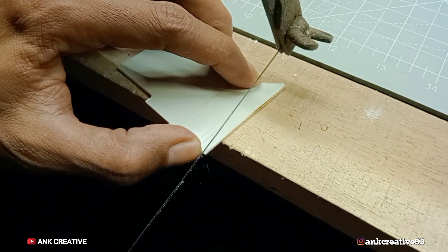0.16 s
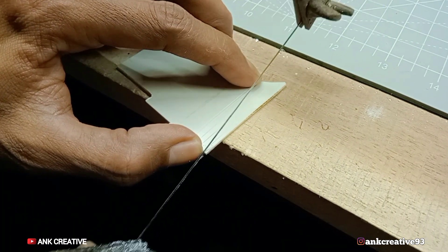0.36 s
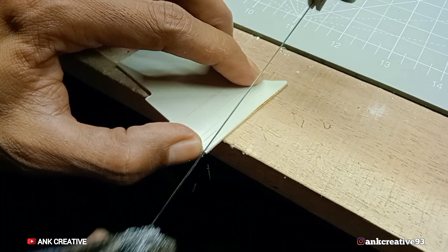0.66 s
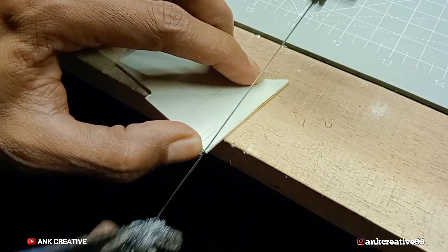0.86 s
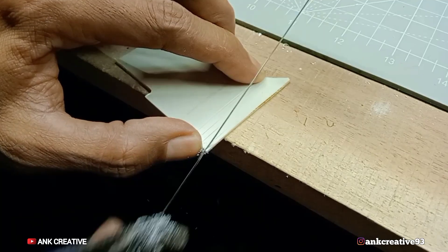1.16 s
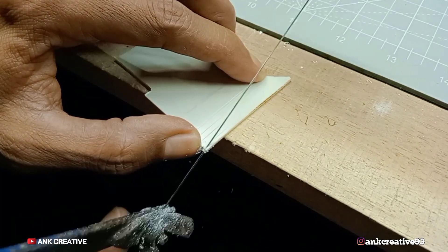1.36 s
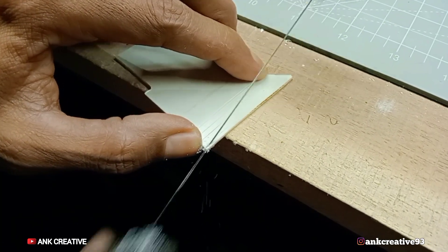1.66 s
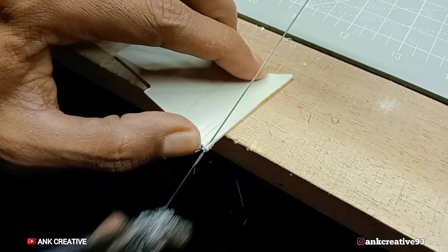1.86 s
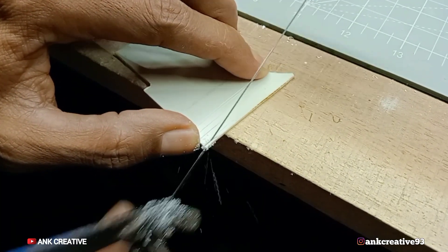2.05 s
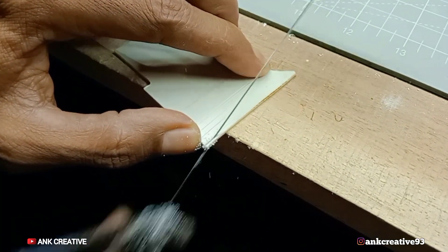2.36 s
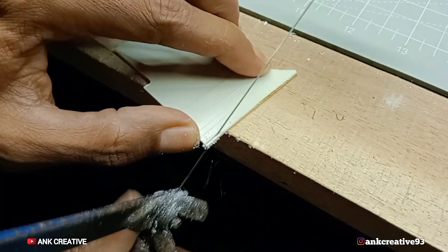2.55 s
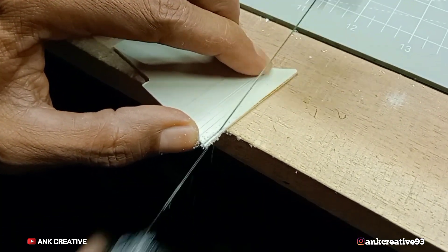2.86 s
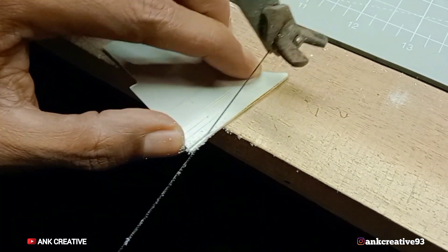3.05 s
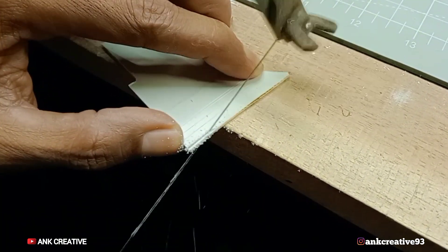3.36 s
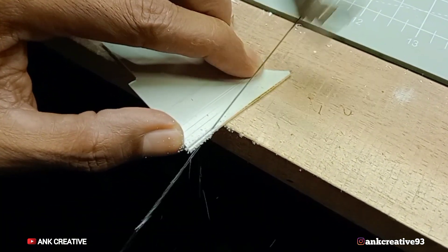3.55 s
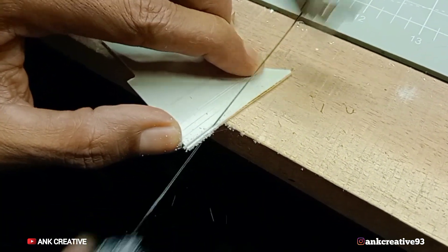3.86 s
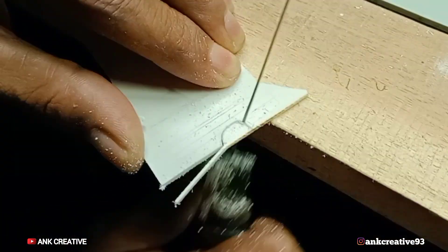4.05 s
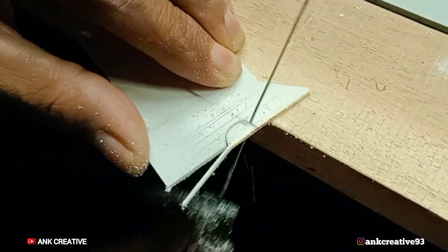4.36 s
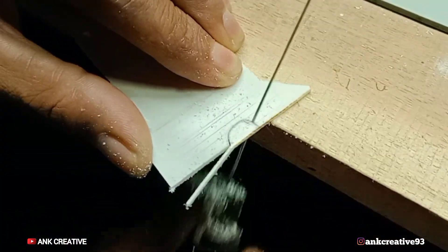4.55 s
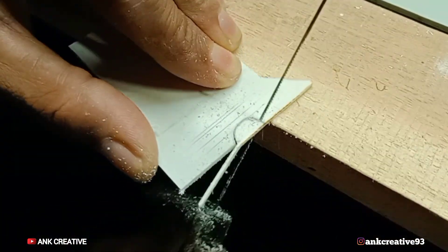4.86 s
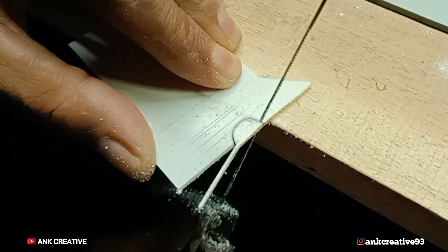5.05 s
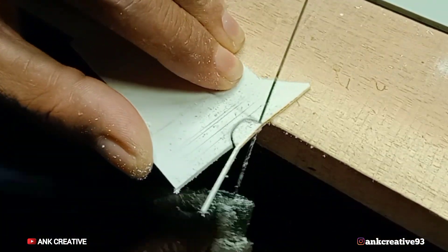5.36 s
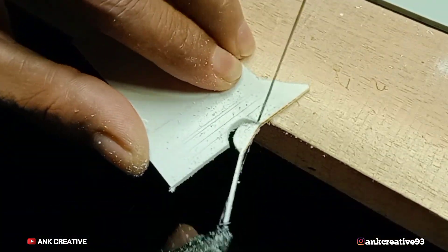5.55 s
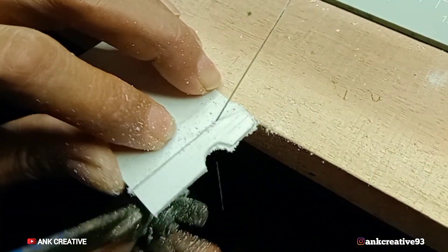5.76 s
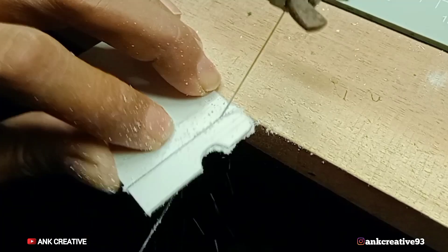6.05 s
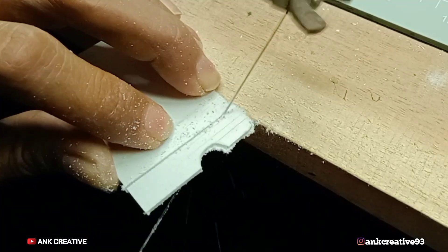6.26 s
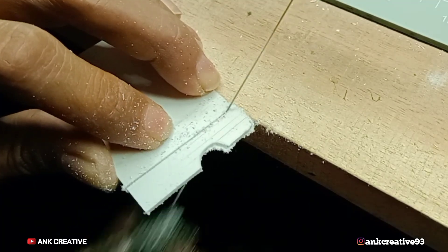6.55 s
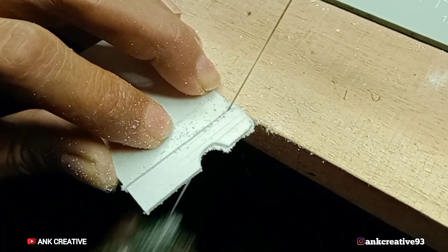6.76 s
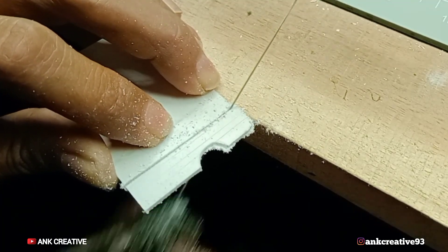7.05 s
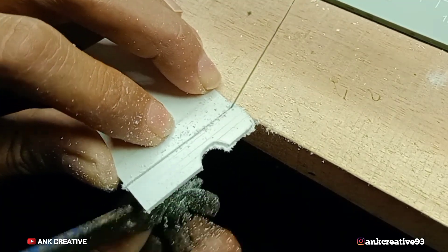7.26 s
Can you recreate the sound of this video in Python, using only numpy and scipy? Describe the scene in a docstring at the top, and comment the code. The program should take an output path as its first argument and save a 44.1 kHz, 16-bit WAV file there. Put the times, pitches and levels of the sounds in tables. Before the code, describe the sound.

Quick rasping saw strokes alternate loud and soft in a small, fairly dry room. They begin almost inaudible, build over a few seconds, pause very briefly, and continue. A hollower, knocking passage with a hard squawking catch follows, then brighter, fuller scraping of plastic that weakens at the close. The microphone is near; a very quiet air murmur and distant wavering insects remain underneath.

```python
"""A fretsaw cuts a thin plastic plate held on the edge of a wooden bench, close to one microphone.
Down strokes, return strokes and faint rubs: tooth impulses and rubbing noise ring plate, bench and blade modes.
Hard and light catches ring single plate modes; low bench modes shudder as the blade chatters.
The balance of the modes changes abruptly at 4.2 and 5.6 s; a short room tail follows the saw.
Filtered noise makes a quiet room murmur and far, wavering cricket bands."""
import sys
import numpy as np
from scipy import signal
from scipy.fft import rfft, irfft, next_fast_len
from scipy.io import wavfile
from scipy.ndimage import uniform_filter1d

SR = 44100
rng = np.random.default_rng(int(sys.argv[2]) if len(sys.argv) > 2 else 0)


def to_linear_factor(level_db):
    """Convert decibel levels (scalar or array-like) to linear amplitude factors."""
    exponent = np.asarray(level_db, float) / 20
    return 10 ** exponent


def to_wav(sig):
    """Store sig (one row per channel, or 1-D mono) as 16-bit WAV at the path in sys.argv[1].

    Samples outside -1..1 are clipped; the rate is SR.
    """
    pcm = np.clip(np.atleast_2d(sig), -1, 1) * 32767
    pcm = np.round(pcm).astype(np.int16)
    wavfile.write(sys.argv[1], SR, pcm.T)  # frames by channels


N = 326340

# plate modes: mode_hz
PLATE_MODES_HZ = (945, 1370, 1740, 1880, 2200, 2560, 2725, 3035, 3310, 3520, 3800, 4200, 4380, 4820, 5480)
# down strokes, teeth biting: start_s, speed_up_s, slow_down_s, peak rasp_db, bench_over_rasp_db
DOWN_STROKES = [(0.224, 0.046, 0.073, -44, 6.5), (0.4, 0.04, 0.06, -37, 8), (0.66, 0.066, 0.035, -33.5, 8),
                (0.907, 0.062, 0.046, -35.5, 10), (1.165, 0.059, 0.034, -32.5, 6),
                (1.406, 0.057, 0.037, -30.5, 6), (1.644, 0.045, 0.05, -28, 4.5),
                (1.885, 0.055, 0.023, -26.5, 4.5), (2.107, 0.066, 0.033, -28, 6),
                (2.363, 0.041, 0.052, -26, 2.5), (2.593, 0.055, 0.037, -24.5, 3.5),
                (2.832, 0.055, 0.04, -25, 2.5), (3.243, 0.062, 0.035, -27, 3.5),
                (3.497, 0.056, 0.031, -24.5, 1), (3.74, 0.049, 0.035, -23.5, 1),
                (3.972, 0.058, 0.036, -24, 1.5), (4.32, 0.055, 0.032, -21.5, 5.5),
                (4.564, 0.044, 0.025, -23.5, 8), (4.787, 0.054, 0.025, -20.5, 6),
                (4.989, 0.054, 0.025, -27, 10), (5.199, 0.054, 0.037, -25, 5),
                (5.471, 0.033, 0.04, -33.5, 6), (5.722, 0.006, 0.022, -27.5, -1),
                (5.805, 0.021, 0.037, -25, 4.5), (5.998, 0.037, 0.031, -21.5, 1),
                (6.212, 0.043, 0.026, -21.5, 1.2), (6.43, 0.026, 0.041, -22.5, 0.8),
                (6.637, 0.042, 0.03, -25, 3.2), (6.865, 0.03, 0.032, -24, 0.7),
                (7.067, 0.057, 0.032, -31.5, 4)]
# return strokes, and faint rubs between strokes or leading into them:
# start_s, speed_up_s, slow_down_s, peak rasp_db, bench_over_rasp_db
RETURNS_AND_RUBS = [(0.061, 0.066, 0.05, -56, 11.5), (0.345, 0.04, 0.015, -53.5, 10.5),
                    (0.51, 0.071, 0.058, -39.5, 3.5), (0.79, 0.028, 0.066, -36.5, 3.5),
                    (1.043, 0.058, 0.043, -34.5, 2), (1.273, 0.072, 0.039, -37, 5.5),
                    (1.513, 0.027, 0.082, -36.5, 1.1), (1.751, 0.072, 0.039, -32.5, -0.5),
                    (1.991, 0.033, 0.071, -35, -2), (2.228, 0.038, 0.074, -36, 2),
                    (2.466, 0.076, 0.026, -32.5, 1.5), (2.705, 0.066, 0.043, -32, 0.2),
                    (3.1, 0.029, 0.013, -49, 0), (3.14, 0.028, 0.057, -34.5, -3.5),
                    (3.361, 0.078, 0.035, -33.5, 3), (3.606, 0.039, 0.066, -35, 3.8),
                    (3.844, 0.077, 0.03, -33, 0.3), (4.088, 0.063, 0.039, -37.5, 2),
                    (4.22, 0.029, 0.019, -42, 5), (4.262, 0.031, 0.018, -29.5, 5),
                    (4.459, 0.025, 0.051, -38, 15), (4.695, 0.008, 0.062, -41.5, 17),
                    (4.887, 0.029, 0.051, -36, 14), (5.122, 0.012, 0.047, -33.5, 8.5),
                    (5.306, 0.025, 0.057, -44, -12), (5.63, 0.017, 0.034, -38, 3.5),
                    (5.775, 0.026, 0.0092, -52, 10), (5.889, 0.058, 0.032, -36, 5),
                    (6.099, 0.058, 0.033, -38.5, 8), (6.315, 0.045, 0.037, -36.5, 10.5),
                    (6.528, 0.058, 0.025, -38, 10), (6.739, 0.056, 0.05, -41, 9.5),
                    (6.968, 0.059, 0.02, -43.5, 13.5), (7.188, 0.056, 0.037, -44, 8.5),
                    (7.29, 0.057, 0.029, -40.5, 4.5)]


def unit(x):
    """Scaled to rms 1."""
    return x / np.sqrt(np.mean(x ** 2) + 1e-20)


def along(points, hz):
    """(Hz, value) points interpolated on a log frequency axis."""
    f, v = np.transpose(points)
    return np.interp(np.log(hz + 1), np.log(f + 1), v)


def wobble(rate_hz, count=1):
    """Random curves: rate_hz Gaussian knots a second, joined by straight lines."""
    knots = rng.standard_normal((count, int(N * rate_hz / SR) + 4))
    at = np.arange(N) * rate_hz / SR
    i, part = at.astype(int), at % 1
    return knots[:, i] * (1 - part) + knots[:, i + 1] * part


def filtered(x, response):
    """x through a complex response of frequency."""
    m = next_fast_len(N + SR // 2)
    return irfft(rfft(x, m) * response(np.fft.rfftfreq(m, 1 / SR)), m)[..., :N]


def resonance(f, hz, width_hz):
    """Response of one damped mode, 1 at its centre."""
    return 1j * f * width_hz / (hz * hz - f * f + 1j * f * width_hz)


def saw():
    """Tooth impulses and rubbing noise, which flares with bursts of tooth impulses, drive plate, bench and
    blade."""
    # modes: width_hz, relative level_db before 4.2 s, from 4.2 to 5.6 s, after 5.6 s
    plate_modes = [(120.5, -1.5, 3.5, 5), (129, -1.5, -2, -1), (123, -7, -2, 0), (120, -3, 1, 3),
                   (131, -1, -1, 5.5), (146, -1.5, -5, 4), (105, 3.5, -0.5, 3.5), (108, 2, -0.5, 2),
                   (142, -3, -4, 1.5), (140, -4, -6, 1), (143, -5, -7.5, -1), (115, -3, -5, -5),
                   (104, -3, -8, -4.5), (198, -14, -23, -13), (200, -20, -42, -20.5)]
    board_modes = [(37.4, -3.5, -2, -4.5), (63.3, -4.5, -4, -5.5), (55.4, -3.5, -2.5, -2.5),
                   (64.4, -8.5, -7.5, -7.5), (26.3, -4, -3, 0.5), (105, -14, -17.5, -10.5)]
    leg_modes = [(30.5, -12, -22, -10), (28.3, 4, 5, 2), (34.8, 0.5, -0.5, 1.5)]
    blade_modes = [(516, -7, -32, -1.5), (220, 1.5, 9, 2.5), (560, -1, 4, 2.5), (340, 2.5, 9, 5.5),
                   (714, -5.5, -12, -8), (1190, -12.5, -12, -9), (900, -9, -27, -14)]
    # bench board, bench legs and blade modes: mode_hz
    board_hz = (150, 230, 290, 435, 505, 650)
    legs_hz = (40, 66, 105)
    blade_hz = (6600, 7320, 8700, 9890, 11300, 13200, 14900)

    speed, (rasp, knock, shake, hiss) = arm(edge_s=.012)
    pulses = teeth(speed, rate_hz=340, scatter=.35, size_db=4.0)
    flare = unit(abs(filtered(pulses, lambda f: 1 / (1 + 1j * f / 150))) + 0.42)

    def rub():
        return unit(rng.standard_normal(N) * flare)

    ring, jolt = snags()
    plate_force = rasp * (0.48 * pulses + 0.56 * rub()) + jolt
    plate = body(plate_force, PLATE_MODES_HZ, plate_modes, fickle_db=3.0, rate_hz=130)
    board_force = knock * (0.35 * pulses + 0.67 * rub()) + 0.66 * jolt
    board = body(board_force, board_hz, board_modes, fickle_db=1.52, rate_hz=35)
    legs_force = shake * (0.42 * pulses + 0.61 * rub())
    legs = body(legs_force, legs_hz, leg_modes, fickle_db=0.5, rate_hz=22)
    blade_force = hiss * (0.39 * pulses + 0.59 * rub()) + 0.074 * jolt
    blade = body(blade_force, blade_hz, blade_modes, fickle_db=4.0, rate_hz=94)

    # soft plastic and wood pass little treble; the thin blade radiates no bass
    def soft(x, top_hz):
        return filtered(x, lambda f: (1 + 1.4j * f / top_hz - (f / top_hz) ** 2) ** -2)

    thin = filtered(blade, lambda f: (f / 6500) ** 2 / (1 + (f / 6500) ** 4) ** .5)
    return soft(plate + ring, top_hz=6000) + soft(board + legs, top_hz=1140) + shudders() + thin


def arm(edge_s):
    """Blade speed 0-1 and drive of plate, board, legs and blade: teeth grip, swell with speed and let go."""
    # swell shape of down strokes, then of returns and rubs: start_under_peak_db,
    # added start db per unit lateness, end_under_peak_db, added end db per unit lateness,
    # legs_over_board_db, hiss_db at a rasp of -30 dB
    down_shape = (-7, 3.5, -9.5, -5, -3, -48)
    return_shape = (-4, -7.5, -6.5, -15, -5.5, -52)
    # slow drift: at_s, added legs_db, added hiss_db
    drift = [(0, 11, -7), (0.4, 4.5, -3), (0.8, -1.5, 0.2), (1.3, -0.5, 3), (2, -0.5, 0.5), (2.9, -1, -0.6),
             (3.15, -1.5, 0.2), (3.6, 1.5, -0.6), (4.15, -0.5, -1.5), (4.3, -4, 0.5), (4.7, -3.5, -1),
             (5.1, -1.2, -2), (5.55, 1, 2.5), (6, 0.5, 2), (6.5, -1.5, 0), (7, 3.7, -1.3), (7.4, 1, 3)]
    speed, drive = np.zeros(N + SR), np.zeros((4, N + SR))
    at_s, legs_drift_db, hiss_drift_db = np.transpose(drift)
    swell_share = np.array([[1], [.8], [.6], [.9]])  # plate, board, legs, blade
    for strokes, shape in ((DOWN_STROKES, down_shape), (RETURNS_AND_RUBS, return_shape)):
        start_db, start_late_db, end_db, end_late_db, legs_db, hiss_db = shape
        for s, up_s, down_s, rasp_db, bench_db in strokes:
            t = np.arange(round((up_s + down_s + 2 * edge_s) * SR)) / SR - edge_s
            v = np.interp(t, [0, up_s, up_s + down_s], [0, 1, 0])
            edge = np.minimum(1.74 * (t + edge_s), t[-1] - t) / (1.53 * edge_s)
            grip = np.clip(edge, 0, 1) ** 1.48
            late = up_s / (up_s + down_s) - .5
            under_db = np.where(t < up_s, start_db + start_late_db * late, end_db + end_late_db * late)
            swell_db = under_db * (1 - v)
            board_db = rasp_db + bench_db
            low_db = board_db + legs_db + np.interp(s, at_s, legs_drift_db)
            # hiss rises 0.82 dB per dB of rasp
            high_db = hiss_db + np.interp(s, at_s, hiss_drift_db) + 0.82 * (rasp_db + 30)
            peak_db = np.c_[[rasp_db, board_db, low_db, high_db]]
            i = round((s - edge_s) * SR)
            speed[i:i + len(t)] = np.sin(np.pi / 2 * v)
            drive[:, i:i + len(t)] += to_linear_factor(peak_db + swell_db * swell_share) * grip
    return speed[:N], drive[:, :N]


def teeth(speed, rate_hz, scatter, size_db):
    """One impulse for each tooth that passes, uneven in time and size; rate grows with blade speed."""
    passed = np.cumsum(rate_hz * (.35 + speed)) / SR
    chance = rng.standard_normal((int(passed[-1]), 2))
    at = np.interp(np.arange(len(chance)) + scatter * chance[:, 0], passed, np.arange(N))
    return unit(np.bincount(at.astype(int), to_linear_factor(size_db * chance[:, 1]), N)[:N])


def body(force, modes_hz, modes, fickle_db, rate_hz):
    """Force rings each mode; as the contact point shifts, each mode is caught more or less strongly."""
    # abrupt changes of mode balance: at_s
    balance_changes_s = (4.2, 5.6)
    width_hz, *levels_db = np.transpose(modes)
    gain = to_linear_factor(levels_db)
    # with each balance, unit white force gives about unit sound
    gain = gain / np.sqrt(np.pi * (gain ** 2 @ width_hz) / SR)[:, None]
    balance = np.searchsorted(balance_changes_s, np.arange(N) / SR)
    gain = gain[balance].T * to_linear_factor(fickle_db * wobble(rate_hz, count=len(modes)))
    m = next_fast_len(N + SR // 2)
    f = np.fft.rfftfreq(m, 1 / SR)
    sign = (-1) ** np.arange(len(modes))
    rings = rfft(force * gain, m) * resonance(f, np.array(modes_hz)[:, None], width_hz[:, None])
    return irfft(sign @ rings, m)[:N]


def snags():
    """A catch favours one ring of the plate, a fluttering decaying sine, and jolts plate, board and blade."""
    # hard tooth catches: start_s, relative level_db, ring_hz
    hard_catches = [(0.7231, -24.5, 2166), (1.2067, -20, 3030), (1.23, -17.5, 3060), (1.4676, -25, 3460),
                    (1.6823, -17, 3315), (1.8167, -27, 3038), (1.935, -21, 3416), (2.1717, -21.5, 3680),
                    (2.3995, -23, 2949), (2.4176, -19.5, 3061), (2.544, -24, 1911), (2.6292, -14, 3088),
                    (2.638, -11, 4220), (2.6618, -17, 2779), (2.8867, -13, 3315), (2.9078, -24, 2719),
                    (3.3025, -20, 4181), (3.3292, -17, 1990), (3.4383, -21, 2708), (3.51, -21.5, 2729),
                    (3.5543, -23, 3067), (3.7678, -16, 3016), (3.7838, -14, 3005), (3.9043, -20, 3055),
                    (3.9684, -24, 1944), (4.0099, -18, 3478), (4.0246, -12.5, 3293), (4.1517, -26, 2700),
                    (4.2873, -21, 1981), (4.3328, -19, 1939), (4.3744, -22, 1970), (4.4877, -20.5, 2290),
                    (4.5903, -23, 1871), (4.602, -14.5, 1795), (4.6925, -33, 1879), (4.7886, -21, 1817),
                    (4.8026, -17.5, 1797), (4.834, -6.5, 1787), (4.9116, -22.5, 2933),
                    (4.9502, -19.5, 1955), (5.0195, -19, 1820), (5.0406, -16, 1820), (5.119, -27.5, 1840),
                    (5.1316, -28, 2550), (5.2336, -25, 2632), (5.2476, -24, 3088), (5.7175, -24, 2562),
                    (5.8182, -15, 3038), (5.8494, -15.5, 2690), (6.0253, -16.5, 2730), (6.036, -15.5, 2732),
                    (6.1444, -24, 1915), (6.25, -9.5, 3347), (6.4469, -15.5, 3470), (6.676, -14, 2209),
                    (6.6958, -23, 2010), (6.8843, -14.5, 2517), (6.9021, -13, 2296), (7.1149, -20, 2170)]
    ring, jolt, t = np.zeros(N + SR), np.zeros(N + SR), np.arange(SR // 20) / SR
    catches = hard_catches + ticks()
    chance = rng.standard_normal((len(catches), len(t)))
    swell = (1 - np.exp(-t / 0.00064)) * to_linear_factor(-60 * t / .024)
    for (s, db, hz), noise in zip(catches, chance):
        flutter = 1 + 4.9 * uniform_filter1d(noise, size=60)
        i = round(s * SR)
        ring[i:i + len(t)] += to_linear_factor(db + 1.5) * swell * flutter * np.sin(2 * np.pi * hz * t)
        jolt[i:i + len(t)] += to_linear_factor(db + 6) * swell ** 3 * noise
    return ring[:N], jolt[:N]


def ticks():
    """One light catch near the fastest part of each stroke or rub, ringing a chance middle plate mode."""
    strokes = DOWN_STROKES + RETURNS_AND_RUBS
    catches = []
    for stroke, (when, size, mode) in zip(strokes, rng.random((len(strokes), 3))):
        s, up_s, _, rasp_db, _ = stroke
        level_db = rasp_db + 1.5 + 6 * (size - .5)
        catches.append((s + up_s * (.5 + when), level_db, PLATE_MODES_HZ[3 + int(7 * mode)]))
    return catches


def shudders():
    """As the blade chatters, one low bench mode builds up to a peak in 14 ms, then dies away."""
    # bench shudders: start_s, peak level_db, mode_hz
    bench_shudders = [(0.26, -30, 80), (0.299, -31, 64.7), (0.432, -25, 100), (0.675, -26, 162),
                      (0.989, -25.5, 108), (1.44, -27, 71), (1.908, -27.5, 311), (2.37, -25, 306.4),
                      (2.878, -29, 85.74), (3.786, -27, 167.3), (4.323, -21.5, 162.5), (4.338, -23, 244),
                      (4.343, -26.5, 82), (4.591, -20, 229.6), (4.612, -18, 153), (4.819, -12, 283),
                      (5.009, -34, 423), (5.021, -15, 148.3), (5.215, -23, 128.5), (6.228, -22, 69.87),
                      (6.236, -26, 289.6), (6.434, -23, 280.8), (6.485, -22, 69.68), (6.692, -23, 67.77),
                      (6.869, -27.5, 261)]
    out, t = np.zeros(N + SR), np.arange(SR // 8) / SR
    phase = rng.uniform(0, 2 * np.pi, len(bench_shudders))
    u = t / 0.014
    swell = (u * np.exp(1 - u)) ** 1.2
    for (s, db, hz), p in zip(bench_shudders, phase):
        out[round(s * SR):][:len(t)] += to_linear_factor(db) * swell * np.sin(2 * np.pi * hz * t + p)
    return out[:N]


def room(x):
    """A small room's noise tail, 200 samples late, each frequency dying at its own speed."""
    # reverberation: band_hz, t60_s
    decay = [(100, 0.58), (1000, 0.15), (4000, 0.1), (12000, 0.093)]
    hz, t, z = signal.stft(rng.standard_normal(SR // 3), SR, nperseg=256)
    tail = signal.istft(z * to_linear_factor(-60 * t / along(decay, hz)[:, None]), SR, nperseg=256)[1]
    return signal.fftconvolve(np.pad(x, (200, 0)), tail / np.linalg.norm(tail))[:N]


def murmur():
    """Quiet room air: shaped noise whose level drifts slightly."""
    # murmur spectrum: band_hz, relative level_db per Hz
    spectrum = [(18, -42), (30, 4.5), (139, -15.5), (1240, -25.5), (2310, -25.5), (4200, -30), (5440, -52),
                (9000, -41), (11000, -50), (15000, -90)]
    level_db = -59 + 0.57 * wobble(4.1)[0]
    return to_linear_factor(level_db) * unit(filtered(rng.standard_normal(N), lambda f: to_linear_factor(along(spectrum, f))))


def crickets():
    """A far chorus blurred into narrow wavering bands: noise through two equal resonances in series."""
    # cricket bands: centre_hz, width_hz of each resonance, rms level_db before wavering
    bands = [(4800, 500, -75.5), (2250, 260, -75)]
    out = np.zeros(N)
    for hz, width_hz, db in bands:
        waver_db = 2 * wobble(14)[0] + 2.5 * wobble(5)[0]
        band = unit(filtered(rng.standard_normal(N), lambda f: resonance(f, hz, width_hz) ** 2))
        out += to_linear_factor(db + waver_db) * band
    return out


def scene():
    """The saw, its room tail, the murmur and the crickets."""
    cut = saw()
    return (cut + to_linear_factor(-14) * room(cut) + murmur() + crickets())[None]


def low_pass(x):
    """Removes everything above the highest recorded frequency."""
    return signal.sosfilt(signal.butter(12, 15700, fs=SR, output="sos"), x)


def record(dry):
    """The microphone rolls off the deepest bass: second-order high-pass at 35 Hz."""
    mic = filtered(dry, lambda f: (1j * f / 35) ** 2 / (1 + 1.4j * f / 35 - (f / 35) ** 2))
    return low_pass(mic)


dry = scene()
out = record(dry)
to_wav(out)
```